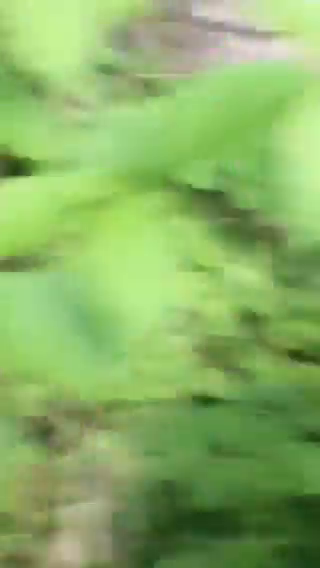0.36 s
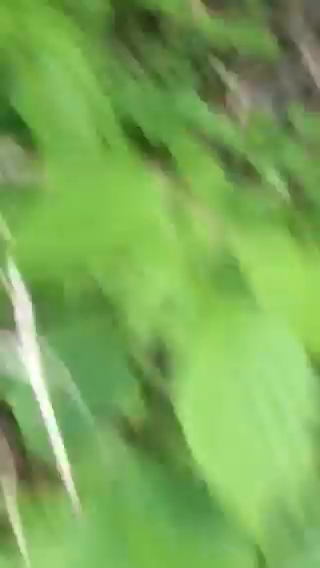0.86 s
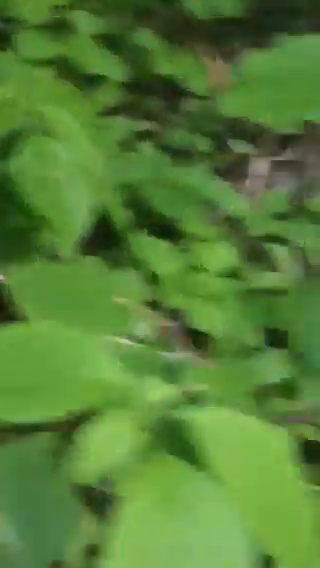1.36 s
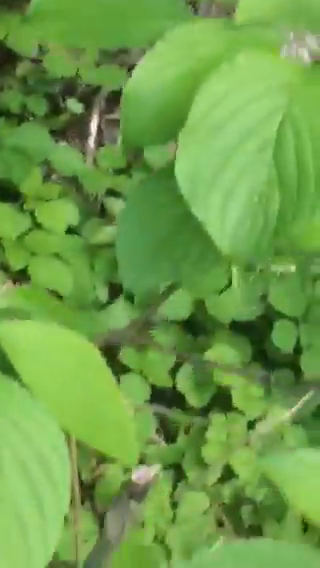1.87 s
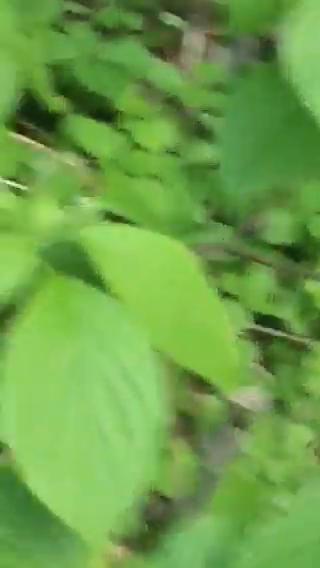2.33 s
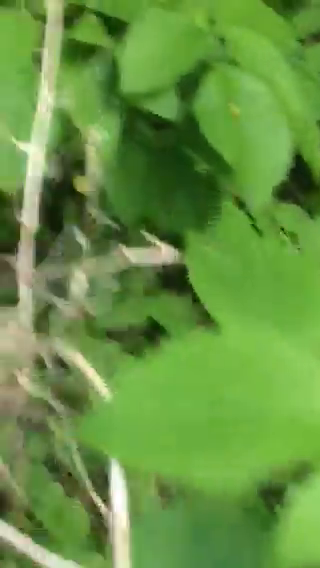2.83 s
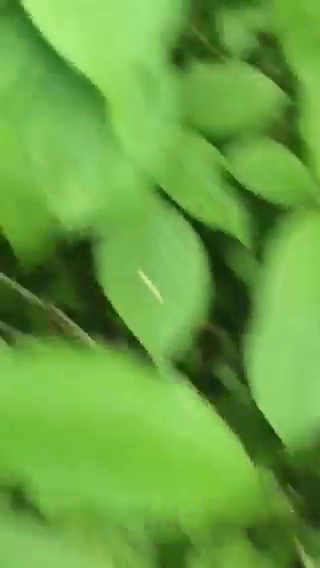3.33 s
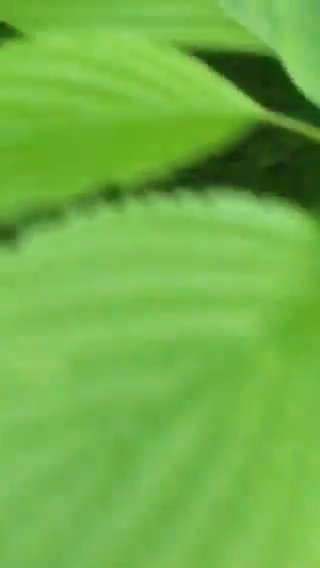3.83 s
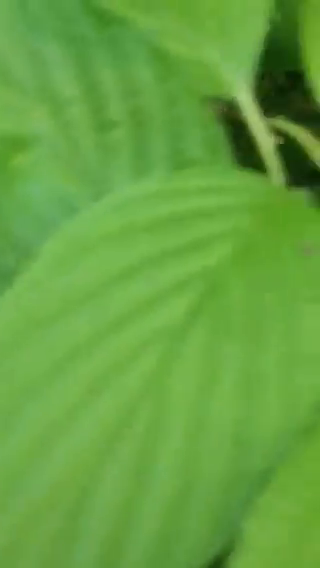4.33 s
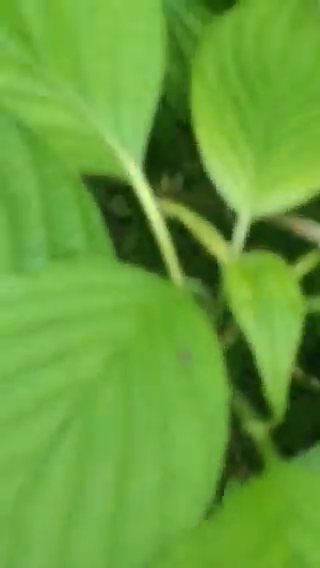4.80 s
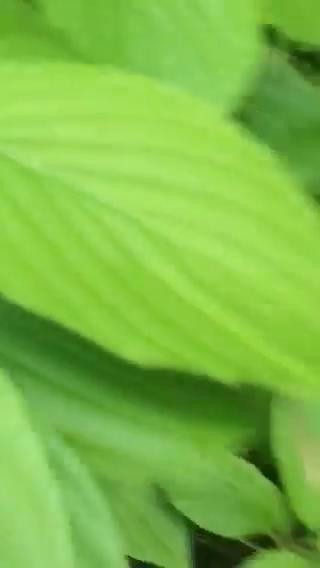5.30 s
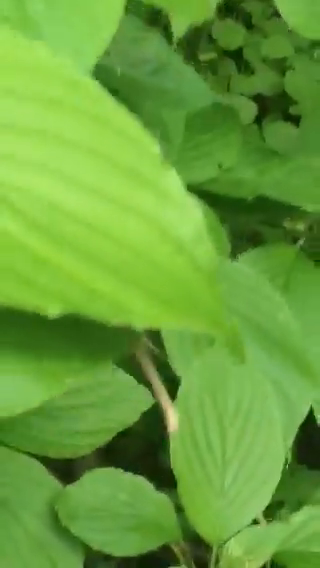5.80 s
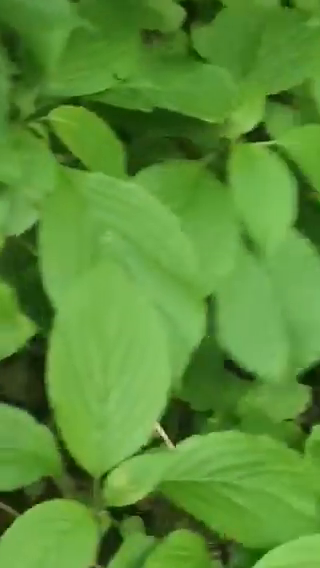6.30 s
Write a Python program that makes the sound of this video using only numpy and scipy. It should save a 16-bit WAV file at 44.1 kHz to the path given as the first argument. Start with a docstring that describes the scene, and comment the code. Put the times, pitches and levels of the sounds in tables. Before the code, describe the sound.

Close to the microphone, leaves and stems brush past as someone pushes through dense woodland. From 0 to 0.8 s there is a busy rustle with a cluster of small dry snaps, strongest near 0.25 s. Until about 2.5 s the brushing softens, with fine ticking and faint, blurred bird calls deep in the wood. A brief leafy swish comes around 2.6 to 2.9 s. At 3.4 s a sharp stem crack, then the loudest snaps at about 3.75 s with a small low jolt. From 3.7 to 4.5 s a near bird sings high slurred whistles, ringing among the trees and ending hoarsely. Crisp snaps and scraping leaves hit around 4.5 to 4.7 s. Light rustling continues; quick lower chirps come near 5.6 s, leaf crunches at 5.9 s, and a last chirp at 6.3 s. A faint distant rumble and low drones stay underneath.

```python
"""Leaves brush and crackle as a walker pushes uphill through undergrowth; dry stems snap near the microphone.
Foliage is coloured noise with random contacts; snaps are noise bursts through a ring, a thud and a fizz.
A near bird sings slurred whistles that ring on among the trees, and others chirp further off: gliding sines
with diffuse echoes. Behind them lie a distant rumble of filtered noise and two faint sine drones."""
import sys
import numpy as np
from scipy import signal
from scipy.fft import rfft, irfft, next_fast_len
from scipy.io import wavfile
from scipy.ndimage import map_coordinates

SR = 44100
rng = np.random.default_rng(int(sys.argv[2]) if len(sys.argv) > 2 else 0)


def unload_wav(signal):
    """Save mono or channel-first audio to the path in sys.argv[1] as 16-bit WAV at rate SR, clipped to [-1, 1]."""
    wavfile.write(
        sys.argv[1],
        SR,
        np.round(np.clip(np.atleast_2d(signal).T, -1, 1) * 32767).astype(np.int16),
    )


def to_linear_factor(level_db):
    """Convert decibel levels (scalar or array-like) to linear amplitude factors."""
    exponent = np.asarray(level_db, float) / 20
    return 10 ** exponent


N = 283122  # length in samples


def unit(x):
    """Scaled to rms 1."""
    return x / np.sqrt(np.mean(x ** 2) + 1e-20)


def along(points, hz):
    """(f/Hz, value) points read on a log frequency axis."""
    f, v = np.transpose(points)
    return np.interp(np.log(hz + 1), np.log(f + 1), v)


def curves(rows):
    """One value per sample for each column after the time."""
    s, *cols = np.transpose(rows)
    return [np.interp(np.arange(N) / SR, s, c) for c in cols]


def wobble(rate):
    """A smooth random curve, rate knots a second."""
    return map_coordinates(rng.standard_normal(N // 20), [np.arange(N) * rate / SR])


def coloured(x, spectrum):
    """x through a (f/Hz, level/dB) spectrum, rms 1."""
    m = next_fast_len(N + 8192)
    gain = to_linear_factor(along(spectrum, np.fft.rfftfreq(m, 1 / SR)))
    return unit(irfft(rfft(x, m) * gain, m)[:N])


def echo(x, decay):
    """A diffuse noise tail in which each frequency dies at its own speed."""
    hz, t, z = signal.stft(rng.standard_normal(SR // 2), SR, nperseg=128)
    fade = to_linear_factor(-60 * t / along(decay, hz)[:, None])
    tail = signal.istft(z * fade, SR, nperseg=128)[1]
    return signal.fftconvolve(x, tail / np.linalg.norm(tail))[:N]


def crackle(rate, spread_db, life_s):
    """Envelope of tiny random contacts: sudden start, quick fade, a few far stronger than the rest."""
    chance, size = rng.random(N), rng.exponential(1, N)
    kicks = (chance < rate / SR) * to_linear_factor(spread_db * np.minimum(size, 3))
    return unit(signal.lfilter([1], [1, -np.exp(-1 / (life_s * SR))], kicks))


# steady brushing of leaves, before flutter: (t/s, body level/dB, fine hiss level/dB)
BRUSHING = [(0.0, -59, -78), (0.14, -58, -63.5), (0.195, -53.5, -53), (0.319, -64.5, -67),
            (0.52, -59.5, -66), (0.93, -64.5, -69.5), (1.164, -66.5, -78.5), (1.39, -64.5, -82),
            (1.884, -63.5, -73.5), (2.342, -65.5, -76.5), (2.4, -64.5, -67), (2.653, -61.5, -57.5),
            (2.807, -63, -72), (3.0, -58.5, -68), (3.225, -65.5, -79), (3.5, -59.5, -65),
            (3.72, -62, -60.5), (3.93, -61.5, -70), (4.319, -60.5, -64), (4.423, -57.5, -54.5),
            (4.56, -53.5, -46.5), (4.838, -56, -55), (5.198, -62.5, -65), (5.465, -60.5, -65),
            (5.532, -66.5, -76), (5.666, -59.5, -59.5), (5.85, -62, -65), (6.089, -60, -58),
            (6.42, -64, -83)]
# short swishes of a sprig flicking past, before flutter: (t/s, body level/dB, fine hiss level/dB)
SPRIG_SWISHES = [(0.377, -59, -71.5), (2.853, -56, -64), (2.944, -57, -60), (6.035, -55, -51)]
SWISH_S = 0.021  # half length of a swish
# a snap shakes the leaves: level/dB relative to its peak, fade by 60 dB/s
SHAKE_BODY_DB, SHAKE_HISS_DB, SHAKE_T60_S = -41, -21.5, 0.093


def stirring():
    """Gains of body and hiss: the powers of brushing, swishes and the shake after each snap or slap add up."""
    t = np.arange(N) / SR
    power = to_linear_factor(np.array(curves(BRUSHING))) ** 2
    for s, *db in SPRIG_SWISHES:
        power = power + to_linear_factor(np.array(db))[:, None] ** 2 * np.exp(-((t - s) / SWISH_S) ** 2)
    hits = STEM_SNAPS + LEAF_SLAPS
    kicks = np.bincount([round(row[0] * SR) for row in hits], [to_linear_factor(2 * row[1]) for row in hits], N)
    shake = signal.lfilter([1], [1, -to_linear_factor(-120 / (SHAKE_T60_S * SR))], kicks)
    shake_gain = to_linear_factor(2 * np.array([[SHAKE_BODY_DB], [SHAKE_HISS_DB]]))
    return np.sqrt(power + shake_gain * shake)


# spectrum of the leafy body: (f/Hz, relative level/dB)
BODY_SPECTRUM = [(200, 6.5), (500, 2.5), (1000, 3), (2500, 0.5), (4500, -2.5), (7000, -4.5), (12000, -12)]
# spectrum of the fine leaf edges: (f/Hz, relative level/dB)
HISS_SPECTRUM = [(2000, -16.5), (5000, -1), (8000, 1), (11000, -4), (15800, -7.5)]


def leaves():
    """Smooth swish plus crackle; broad leaves and fine leaf edges share only part of their contacts."""
    body_gain, hiss_gain = stirring()
    shared, broad, fine = (crackle(rate=200, spread_db=3.5, life_s=0.0018) for _ in range(3))
    flutter_db = 1.18 * wobble(22)
    body_contacts = 1 + 0.22 * shared + 0.31 * broad
    hiss_contacts = 1 + 0.44 * shared + 0.074 * fine
    body = coloured(rng.standard_normal(N) * body_contacts, BODY_SPECTRUM)
    hiss = coloured(rng.standard_normal(N) * hiss_contacts, HISS_SPECTRUM)
    return body_gain * to_linear_factor(0.81 * flutter_db) * body + hiss_gain * to_linear_factor(flutter_db) * hiss


# snaps of dry stems: (t/s, direct peak level/dB, ring f/Hz, thud gain/dB, fizz gain/dB)
STEM_SNAPS = [(0.015, -40, 2300, 29, -31), (0.213, -36, 3870, -21, -32), (0.239, -31.5, 3900, -12, -25),
              (0.2449, -23.5, 4000, 6, -1), (0.346, -37, 5030, 15, -21), (0.382, -30.5, 4730, 1, -9),
              (0.4409, -39, 5440, 3, -14.5), (0.4956, -37, 4940, -10, -14), (0.5144, -32.5, 8200, 3, -18),
              (0.614, -40.5, 7400, -2, -24), (0.652, -42, 6000, -8.5, -17), (0.5301, -34.5, 2620, -4, -33),
              (0.6739, -39.5, 2570, 25, -8), (0.7177, -36, 1930, 14, -25), (0.752, -40, 4500, 1, -24),
              (0.765, -41.5, 4400, -9, -20), (0.7983, -32.5, 7340, -4.5, -20),
              (1.2051, -40, 9000, -2, -15.5), (1.804, -41.5, 4700, -1, -11), (2.6582, -42, 2720, -4, -18),
              (3.4257, -27.5, 2720, -40, -35), (3.4259, -18.5, 6050, -45, -17),
              (3.4315, -29, 5600, -29, -10), (3.6434, -37, 8440, -21, -16), (3.746, -9, 5060, -21, -48),
              (3.7587, -16, 6100, -13.5, -28), (3.8023, -24, 7860, -18, -23),
              (3.8116, -15.5, 6400, -32, -38), (4.0965, -30.5, 8600, -7, -8), (4.388, -41, 4300, 6, -25),
              (4.4165, -27, 6300, -14, -9), (4.5603, -16.5, 9700, -28, -10), (4.5621, -15, 6200, -27, -5),
              (4.6715, -25.5, 2280, -5, -6), (5.4017, -33.5, 6770, -10, 2)]
# slaps and crunches of whole leaves, which last longer; same columns
LEAF_SLAPS = [(3.4762, -31.5, 5680, -17, -14), (3.333, -41.5, 4600, 2, -13), (4.055, -35, 4800, -4, -10),
              (4.5205, -26, 11000, -21, -6), (4.5247, -20.5, 8100, -18, -8), (4.802, -41, 910, -2, -19),
              (4.773, -35.5, 6200, -14, -14), (5.1343, -33.5, 8500, -10, -2), (5.898, -19, 5620, -13.5, -9),
              (5.9349, -21.5, 5900, -8.5, -8.5), (6.0232, -32, 6160, -6, -4)]
# echo of the foliage: (f/Hz, fade by 60 dB/s)
FOLIAGE_ECHO = [(300, 0.03), (2500, 0.2), (6500, 0.2), (14000, 0.15)]
SNAP_T60_S, SLAP_T60_S, SNAP_RISE_S, SLAP_RISE_S = 0.016, 0.023, 0.0004, 0.0015
# only in snaps, over the splintering: the first instant and its fade, then one sharp break
CRACK_DB, CRACK_T60_S, BREAK_DB = 9, 0.0045, 18.5


def snaps():
    """Each snap is a burst of splintering through a ring, a low thud and a fizz, then scattered by the foliage."""
    size = 4096
    out, t = np.zeros(N + size), np.arange(size) / SR
    f = np.fft.rfftfreq(size, 1 / SR)

    def band(hz, width):
        """Response of a resonance at hz."""
        return 1j * f * width / (hz * hz - f * f + 1j * f * width)

    rows = [(True, SNAP_RISE_S, SNAP_T60_S, *row) for row in STEM_SNAPS]
    rows += [(False, SLAP_RISE_S, SLAP_T60_S, *row) for row in LEAF_SLAPS]
    for is_snap, rise, t60, s, db, hz, thud_db, fizz_db in rows:
        envelope = to_linear_factor(-60 * t / t60)
        if is_snap:
            envelope = envelope + to_linear_factor(CRACK_DB - 60 * t / CRACK_T60_S)
        burst = rng.standard_normal(size) * envelope * (1 - np.exp(-t / rise))
        if is_snap:
            burst[round(rise * SR)] += to_linear_factor(BREAK_DB)
        ring = band(hz, 0.35 * hz) ** 1.49
        thud = to_linear_factor(thud_db) * band(1020, 950)
        fizz = to_linear_factor(fizz_db) * band(14200, 15000) ** 2
        snap = irfft(rfft(burst) * (ring - thud - fizz))
        out[round(s * SR):][:size] += to_linear_factor(db) * snap / np.abs(snap).max()
    direct = out[:N]
    return direct + to_linear_factor(-8.5) * echo(direct, FOLIAGE_ECHO)


# some breaks also jolt the branch: (t/s, peak level/dB, f/Hz)
BRANCH_JOLTS = [(0.014, -38.5, 506), (3.428, -41.5, 384), (3.747, -27.5, 390), (3.748, -35.5, 165)]


def thumps():
    """A low push and rebound that falls by 60 dB in 4.2 cycles."""
    out, t = np.zeros(N), np.arange(2048) / SR
    for s, db, hz in BRANCH_JOLTS:
        swing = to_linear_factor(db - 60 * t * hz / 4.2) * np.sin(2 * np.pi * hz * t)
        out[round(s * SR):][:2048] += np.gradient(swing) * SR / (2 * np.pi * hz)
    return out


# the clearest twig clicks: (t/s, level/dB before the 8.5 dB lift in ticks(), f/Hz)
TWIG_CLICKS = [(0.11, -51, 1840), (0.354, -43, 4650), (0.4868, -42, 8000), (0.9115, -45, 5360),
               (0.9361, -45, 5700), (1.78, -46.5, 6200), (4.8618, -40, 6172), (5.0558, -45, 3500),
               (5.8995, -30.5, 2580), (6.264, -49, 3000)]
TICKS_PER_S, TICK_HZ, TICK_OCTAVES = 130, 4400, 0.8  # mean rate, middle pitch and its random spread
TICK_CYCLES = 1.3  # cycles in which a click fades to 1/e
TICK_DB, TICK_SPREAD_DB = 10, 2  # gain over the brushing, and random extra
TICK_BODY_DB = -12  # broad leaves also set off clicks


def ticks():
    """Small twigs and leaf ribs click as decaying sines; the random ones follow the level of the brushing."""
    start, size, pitch = rng.random(1000), rng.exponential(1, 1000), rng.standard_normal(1000)
    gaps_s = -np.log(start + 1e-9) / TICKS_PER_S
    at = (np.cumsum(gaps_s) * SR).astype(int)
    hz = np.clip(TICK_HZ * 2 ** (TICK_OCTAVES * pitch), 800, 12000)
    body_db, hiss_db = curves(BRUSHING)
    around = np.hypot(to_linear_factor(body_db + TICK_BODY_DB), to_linear_factor(hiss_db))[np.minimum(at, N - 1)]
    strength = to_linear_factor(TICK_DB + TICK_SPREAD_DB * np.minimum(size, 2.2))
    gain = around * strength * np.sqrt(hz / TICK_HZ) * (at < N)
    s, db, ring = np.transpose(TWIG_CLICKS)
    at = np.append(at, (s * SR).astype(int))
    gain = np.append(gain, to_linear_factor(db + 8.5))[:, None]
    hz = np.append(hz, ring)[:, None]
    n = np.arange(512)
    grains = gain * np.sin(2 * np.pi * hz * n / SR) * np.exp(-hz * n / SR / TICK_CYCLES)
    places = np.minimum(at, N)[:, None] + n
    out = np.bincount(places.ravel(), grains.ravel(), N + 512)[:N]
    return out + to_linear_factor(-5.5) * echo(out, FOLIAGE_ECHO)


# a stem dragged over a leaf: (t/s, length/s, f/Hz, level/dB before its fade)
STEM_SCRAPES = [(2.843, 0.05, 2100, -56.5), (4.587, 0.057, 2300, -50.5), (4.662, 0.064, 1940, -48)]


def scrapes():
    """Grainy rubbing in a resonance of the leaf, sudden start and slow fade."""
    out, t = np.zeros(N), np.arange(N) / SR
    rub = rng.standard_normal(N) * (1 + crackle(rate=400, spread_db=4, life_s=0.0015))
    for s, long, hz, db in STEM_SCRAPES:
        u = (t - s) / long  # 0 to 1 through the scrape
        tone = coloured(rub, [(hz / 2, -30), (hz * 0.76, -3), (hz * 1.43, -3), (hz * 2, -24)])
        ends = np.clip(np.minimum(20 * u, 10 * (1 - u)), 0, 1)
        out += to_linear_factor(db - 9.6 * np.clip(u, 0, 1)) * ends * tone
    return out


def whistles(notes, overtone_db, rough_hz):
    """Gliding sines with a weak octave; the pitch trembles quickly by rough_hz."""
    out, tremble = np.zeros(N), rough_hz * wobble(420)
    for note in notes:
        s, hz, db = np.transpose(note)
        n = np.arange(int(s[0] * SR), min(int(s[-1] * SR), N))
        phase = 2 * np.pi * np.cumsum(np.interp(n / SR, s, hz) + tremble[n]) / SR
        tone = np.sin(phase) + to_linear_factor(overtone_db) * np.sin(2 * phase)
        out[n] += np.sqrt(2) * to_linear_factor(np.interp(n / SR, s, db)) * tone
    return out


CHIRP_FADE_DB, CHIRP_ROUND = 16, 1.35  # level lost at both ends; how rounded the bend is


def bent(rows, hold):
    """Notes whose pitch runs through three points and whose level swells and fades, flatter for a larger hold."""
    u = np.linspace(-1, 1, 21)
    bend = 1 - np.abs(u) ** CHIRP_ROUND
    notes = []
    for s, long, first, middle, last, db in rows:
        straight = (first + last + u * (last - first)) / 2
        hz = straight + bend * (middle - (first + last) / 2)
        level_db = db - CHIRP_FADE_DB * np.abs(u) ** hold
        notes.append(np.transpose([s + long * (u + 1) / 2, hz, level_db]))
    return notes


# near bird, one table a note: (t/s, f/Hz, direct level/dB)
NEAR_SONG = [
    [(3.705, 6840, -64), (3.745, 6690, -56), (3.79, 6200, -67)],
    [(3.835, 7600, -81), (3.85, 7470, -58.5), (3.92, 6960, -56.5), (3.97, 6330, -44), (3.995, 6140, -60),
     (4.005, 6160, -75)],
    [(4.035, 7970, -64), (4.045, 7670, -51), (4.13, 7280, -51), (4.17, 6600, -42), (4.195, 6150, -49.5),
     (4.205, 6140, -80)],
    [(4.24, 7750, -55), (4.255, 8100, -52), (4.29, 8358, -50), (4.325, 8660, -52), (4.34, 8700, -74)],
]
# its hoarse two-voiced ending, one table a voice; same columns
HOARSE_ENDING = [
    [(4.36, 5400, -66), (4.38, 5510, -53), (4.42, 5500, -52.5), (4.47, 6020, -55), (4.495, 5550, -57),
     (4.515, 5060, -46), (4.54, 4550, -68)],
    [(4.365, 6050, -60), (4.39, 6080, -52), (4.44, 6210, -46.5), (4.47, 6860, -50), (4.495, 7500, -50),
     (4.515, 7800, -60)],
]
# further birds, one row a note: (t/s, length/s, first f/Hz, middle f/Hz, last f/Hz, direct peak level/dB)
FAR_CHIRPS = [(3.96, 0.028, 1900, 2300, 2750, -57), (5.325, 0.044, 2700, 2526, 2450, -58.5),
              (5.352, .014, 2400, 1870, 1500, -60), (5.50, 0.041, 1490, 1590, 1630, -63),
              (5.5585, 0.008, 3400, 2800, 2100, -54), (5.5795, 0.025, 2150, 3350, 2000, -46.5),
              (5.612, 0.018, 2450, 3750, 1800, -47.5), (5.636, 0.018, 2200, 3420, 2100, -52),
              (6.205, 0.052, 2090, 2070, 2030, -62), (6.306, 0.08, 2300, 2640, 2170, -52)]
# faint blurred calls deep in the wood; same columns, level/dB before the gains in birds()
FAINT_CALLS = [(.84, .08, 5400, 4950, 4860, -71.5), (1.232, 0.04, 3250, 2740, 2800, -67.5),
               (1.27, 0.033, 3370, 3230, 2950, -75), (1.33, .135, 3130, 3120, 3150, -81),
               (1.395, 0.08, 2350, 2760, 2750, -73), (1.74, 0.079, 5540, 5160, 4950, -74),
               (2.62, 0.15, 4000, 4300, 4350, -73.5), (6.175, 0.05, 4900, 4850, 4780, -72)]
# echo of the trunks: (f/Hz, fade by 60 dB/s)
TRUNK_ECHO = [(2500, 0.19), (6500, 0.44), (12000, 0.011)]
TRUNK_S, TRUNK_DB = 0.0115, -8  # one trunk sends the chirps back a moment later


def birds():
    """The whistles arrive wrapped in echoes from the trunks, which smear each glide."""
    near = whistles(NEAR_SONG, overtone_db=-39, rough_hz=69)
    near += whistles(HOARSE_ENDING, overtone_db=-45, rough_hz=150)
    chirps = whistles(bent(FAR_CHIRPS, hold=1.7), overtone_db=-16, rough_hz=12)
    faint = whistles(bent(FAINT_CALLS, hold=5.4), overtone_db=-36, rough_hz=60)
    bounce = to_linear_factor(TRUNK_DB) * np.roll(chirps, round(TRUNK_S * SR))
    far_echo = echo(to_linear_factor(-9) * chirps + to_linear_factor(-2.5) * faint, TRUNK_ECHO)
    far = chirps + bounce + to_linear_factor(-3) * faint + far_echo
    return near + to_linear_factor(-0.5) * echo(near, TRUNK_ECHO) + far


# low drones far away, one table a drone: (t/s, f/Hz, level/dB before wavering)
FAR_DRONES = [
    [(3.4, 147, -74.5), (4.0, 147.3, -68.5), (4.8, 150.1, -64.5), (5.1, 154.5, -72), (5.4, 154, -99)],
    [(5.6, 90.8, -98), (5.9, 96.6, -67), (6.25, 103.7, -59.5), (6.42, 105, -49.5)],
]
# spectrum of the far rumble: (f/Hz, relative level/dB)
RUMBLE_SPECTRUM = [(15, -70), (25, -49), (61, 2), (118, -11.5), (189, -3.5), (308, -10), (345, -7),
                   (447, -15), (1200, -24.5), (1560, -38), (2640, -120)]
RUMBLE_DB = -60.5  # rms before drift


def distance():
    """Far rumble of filtered noise that drifts slowly, and sine drones that waver."""
    drift_db = 0.9 * wobble(4)
    rumble = to_linear_factor(RUMBLE_DB + drift_db) * coloured(rng.standard_normal(N), RUMBLE_SPECTRUM)
    waver = to_linear_factor(1.3 * wobble(13))
    return rumble + waver * whistles(FAR_DRONES, overtone_db=-29, rough_hz=0)


def scene():
    """All sources at one microphone."""
    foliage = leaves() + ticks() + scrapes()
    breaks = snaps() + thumps()
    return (foliage + breaks + birds() + distance())[None]


def band_limit(x):
    """A steep low-pass at the top of the band."""
    return signal.sosfilt(signal.butter(12, 16970, fs=SR, output="sos"), x)


# steep low-pass near 16 kHz: (f/Hz, gain/dB)
LOWPASS = [(15850, 0), (16000, -24)]


def record(dry):
    """A steep low-pass near 16 kHz finishes the mix."""
    cut = to_linear_factor(along(LOWPASS, np.fft.rfftfreq(N, 1 / SR)))
    mix = irfft(rfft(dry) * cut, N)
    return band_limit(mix)


dry = scene()
out = record(dry)
unload_wav(out)
```